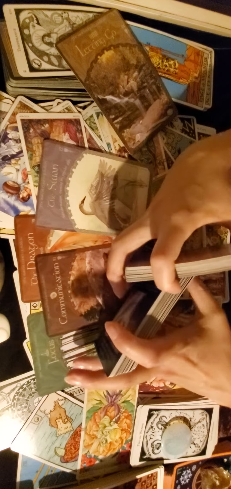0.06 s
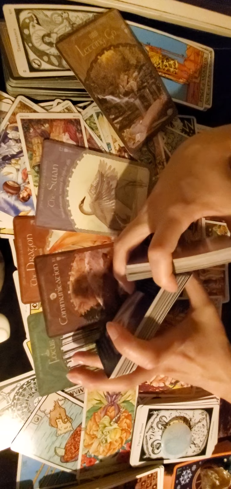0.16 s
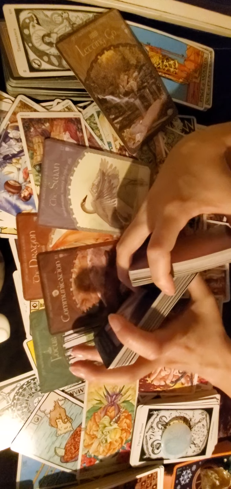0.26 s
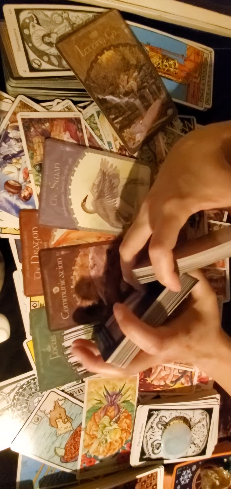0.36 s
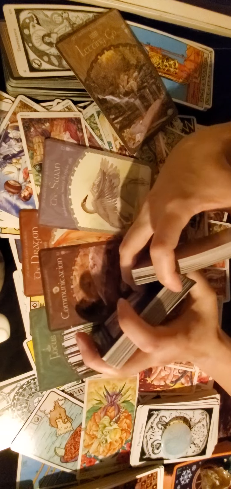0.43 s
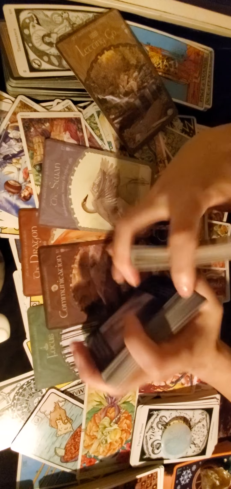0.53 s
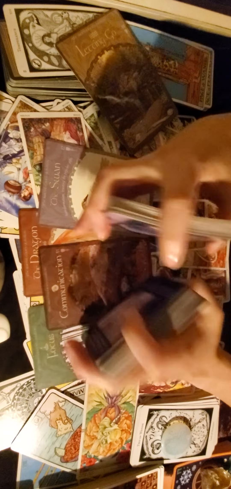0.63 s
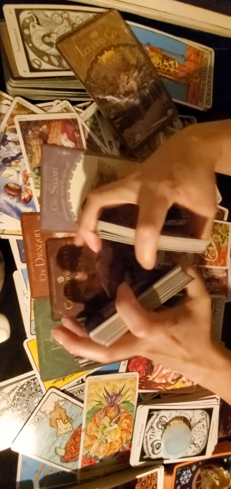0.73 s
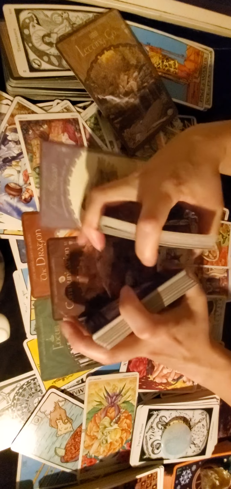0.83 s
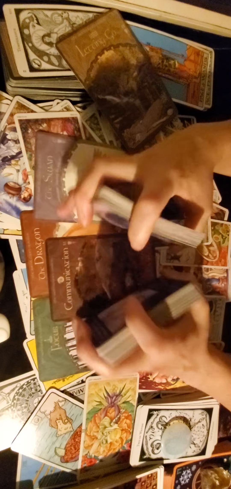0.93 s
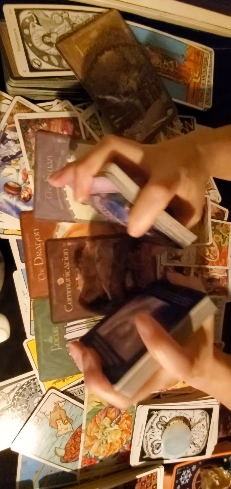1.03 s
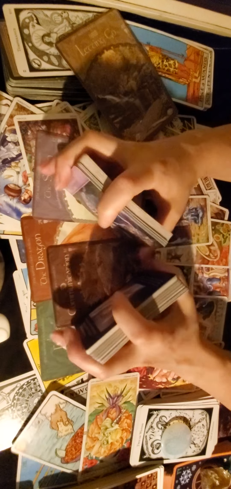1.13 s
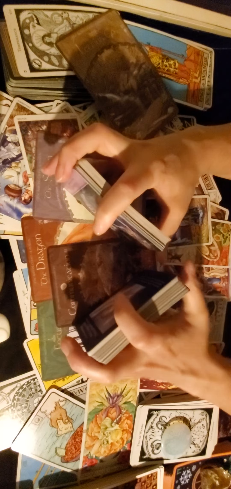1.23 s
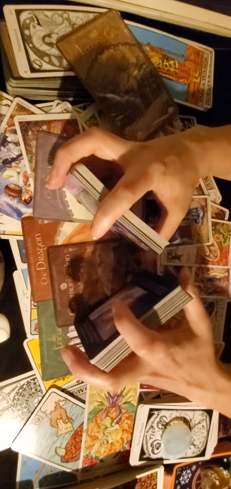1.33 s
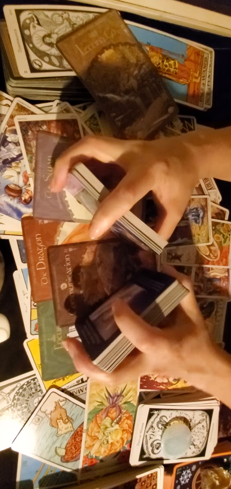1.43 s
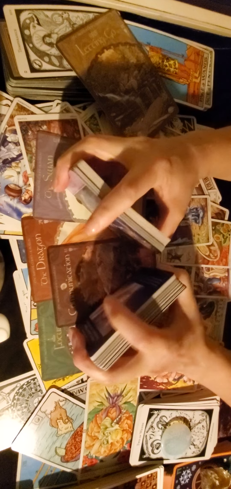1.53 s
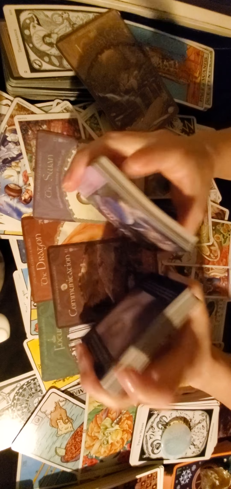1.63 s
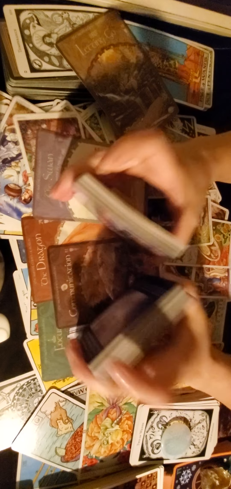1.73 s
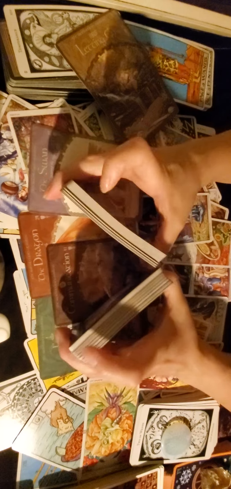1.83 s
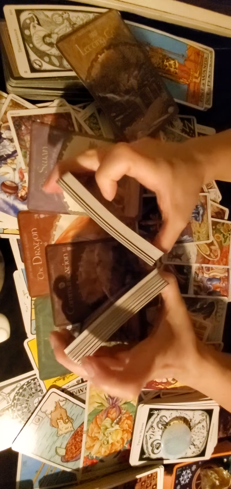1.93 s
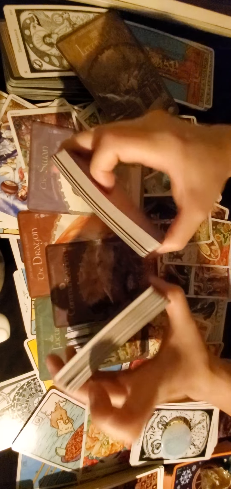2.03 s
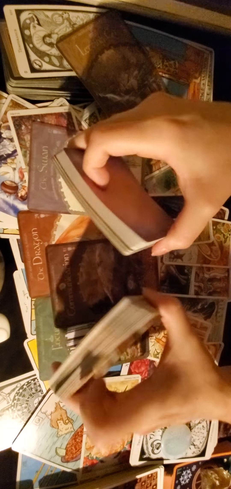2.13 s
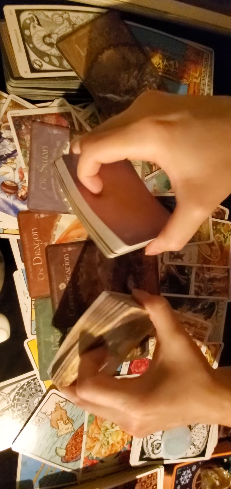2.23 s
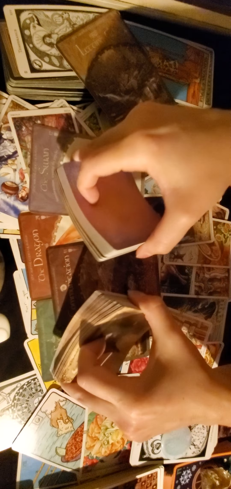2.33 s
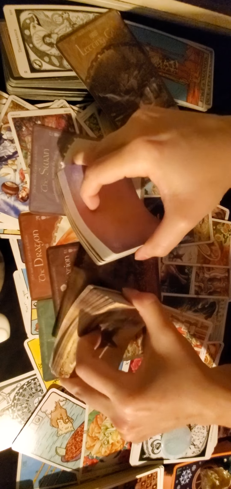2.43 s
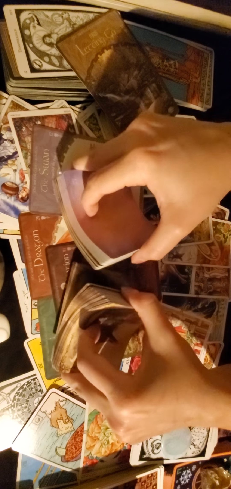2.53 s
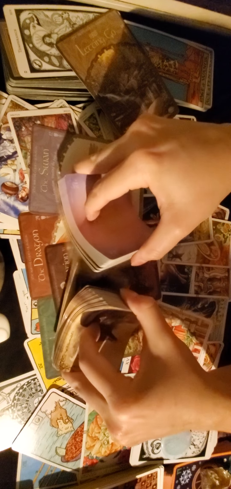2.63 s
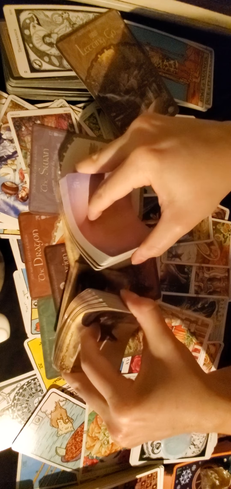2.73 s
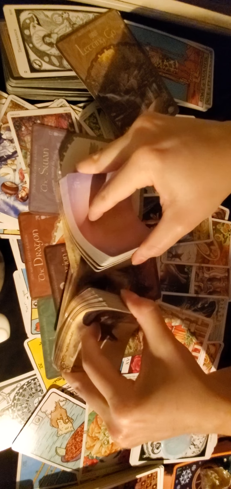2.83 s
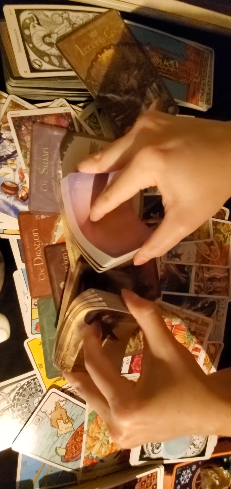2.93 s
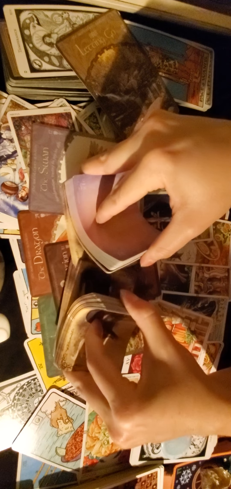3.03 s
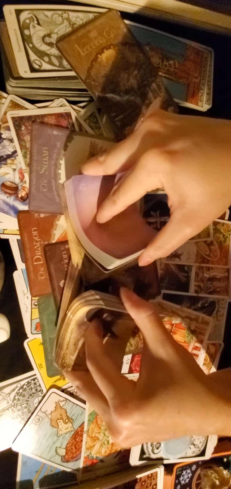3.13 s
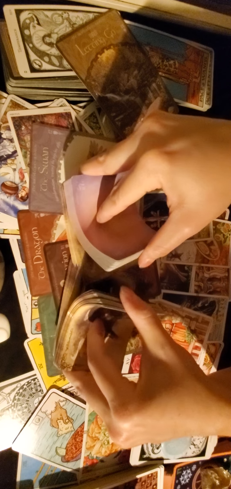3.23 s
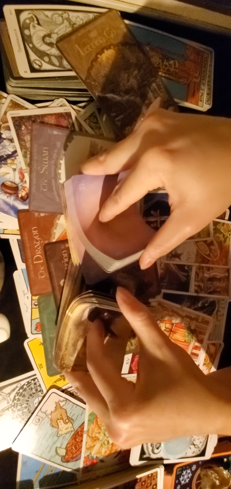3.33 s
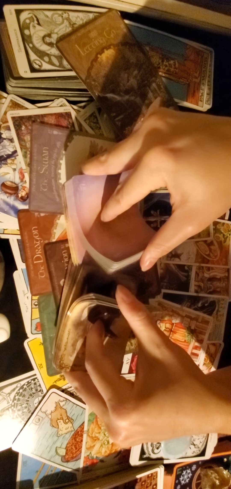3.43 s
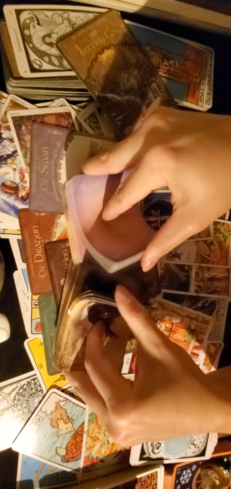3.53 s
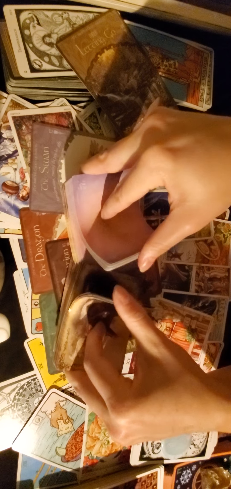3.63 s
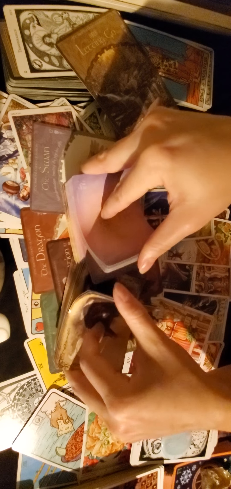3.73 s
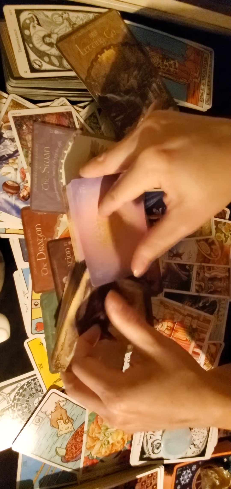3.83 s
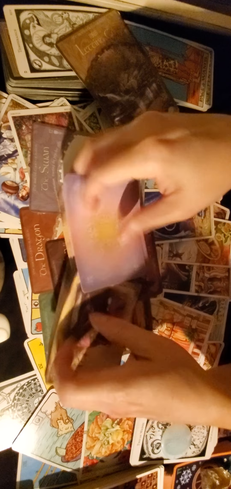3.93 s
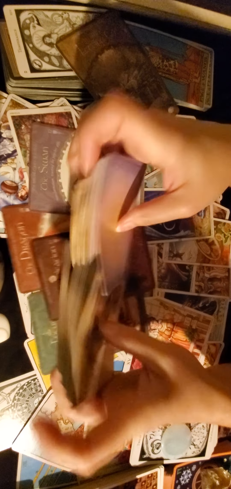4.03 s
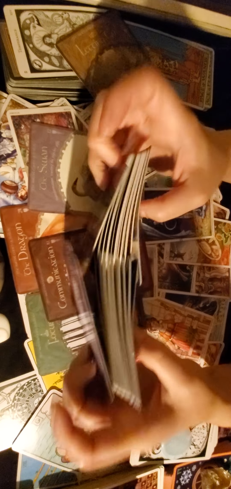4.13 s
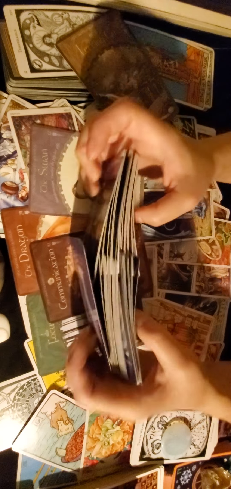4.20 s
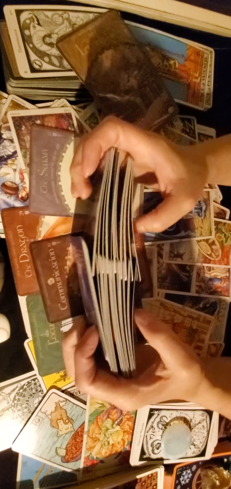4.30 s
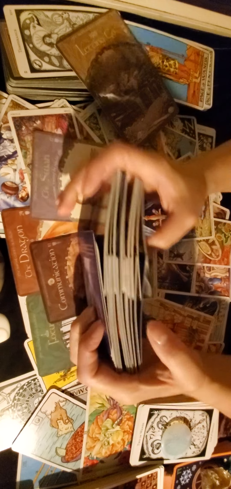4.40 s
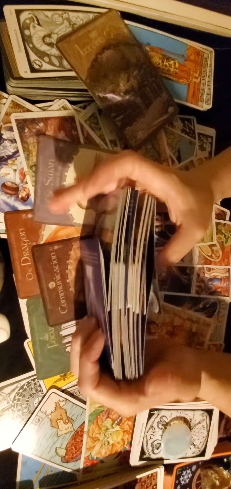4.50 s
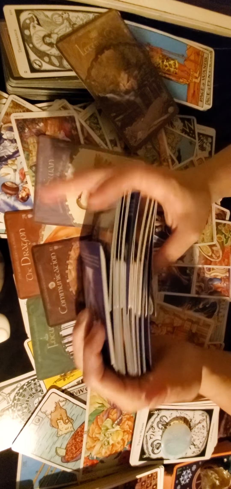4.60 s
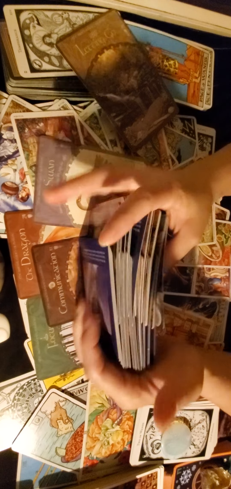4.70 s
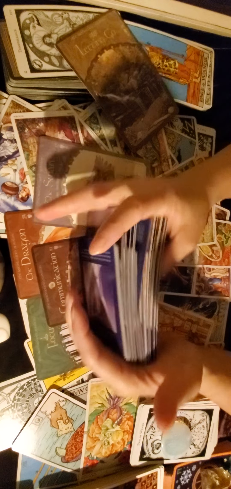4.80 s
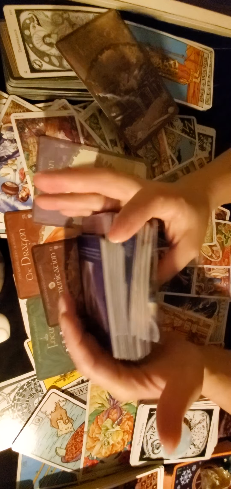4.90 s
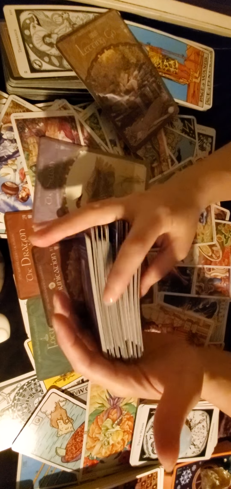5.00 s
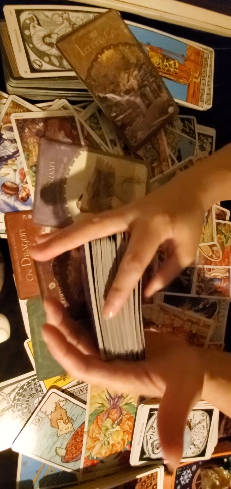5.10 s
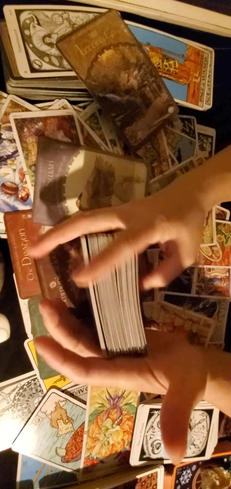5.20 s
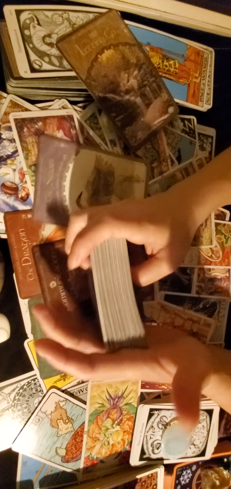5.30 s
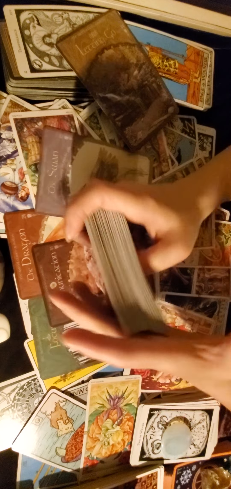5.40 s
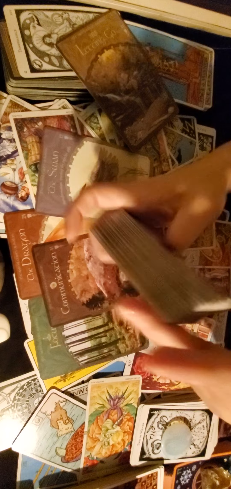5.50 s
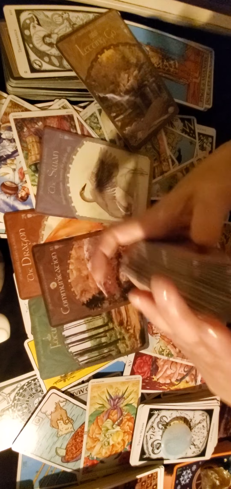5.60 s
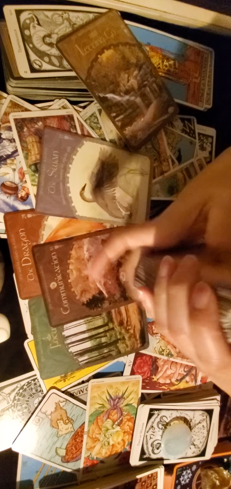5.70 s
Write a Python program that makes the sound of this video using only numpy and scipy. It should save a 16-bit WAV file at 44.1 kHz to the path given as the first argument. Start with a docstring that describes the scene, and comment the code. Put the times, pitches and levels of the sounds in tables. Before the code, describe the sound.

Hands shuffle stiff cards very near the microphones in a small room. Packets knock together three times with low thumps, edges tick quietly, then the halves interleave in a fast, irregular crackle, the loudest part. The cards fall together with a brief hollow purr, and sliding faces rustle and hiss between muted taps before fading to faint handling over a low rumble. The left side is stronger.

```python
"""A deck of stiff cards is cut, knocked on a covered table, riffled, bridged and squared, close up.
Cards snap off the thumbs: each snap is a short filtered burst with a low slap, a flexing clack and an edge tick.
Packets patter in flurries of small random touches, and sliding faces rustle and hiss as grainy noise.
Soft blows ring the table's low modes; near echoes and a small room answer over a low rumble and faint hiss."""
import sys
import numpy as np
from scipy import signal
from scipy.fft import rfft, irfft
from scipy.io import wavfile
from scipy.ndimage import uniform_filter1d

SR = 44100
rng = np.random.default_rng(int(sys.argv[2]) if len(sys.argv) > 2 else 0)


def wav_record(signal):
    """Record a signal, one row per channel, as 16-bit PCM in the file named by sys.argv[1]."""
    frames = np.transpose(np.atleast_2d(signal))
    bounded = np.clip(frames, -1, 1)
    # unit amplitude maps onto the largest positive 16-bit level
    quanta = np.round(bounded * 32767).astype(np.int16)
    wavfile.write(sys.argv[1], SR, quanta)


N = 253575
HZ, TIME = np.fft.rfftfreq(N, 1 / SR), np.arange(N) / SR

# A card edge snaps or lands. Each row: time in seconds, clack level in dB before the common trim in snaps(),
# pitch of the flexing card in Hz, edge tick in dB added to the clack column (it has its own trim).
SNAPS = [(0.184, -55, 2760, -3), (0.43, -52.5, 1750, -15), (0.766, -29, 1410, 1), (0.77, -26, 2100, -4),
         (0.792, -17.5, 2950, -24), (0.804, -23.5, 1220, -11), (1.215, -17.5, 2200, -12.5),
         (1.226, -23, 850, -8), (1.861, -25, 1210, -12), (1.867, -18, 1400, -5.5), (1.88, -23.5, 1500, -13),
         (2.003, -48.5, 1210, -9.5), (2.124, -45, 2150, -6), (2.364, -51.5, 982, -12),
         (2.432, -44, 1490, -11), (2.574, -23.5, 2600, -6.5), (2.608, -33.5, 1250, -3),
         (2.617, -30.5, 1165, -14), (2.642, -33.5, 1150, -8.5), (2.689, -34.5, 1260, -9.5),
         (2.73, -29.5, 1590, -9.5), (2.74, -19.5, 1510, -15.5), (2.771, -10.5, 1480, -10.5),
         (2.813, -11, 1150, -7), (2.844, -30, 1600, -5.5), (2.856, -9.5, 3030, -11.5),
         (2.935, -10.5, 740, -12), (2.973, -11.5, 2100, -11.5), (3.037, -6, 1400, -13.5),
         (3.115, -20, 2550, -11), (3.135, -8.5, 1580, -17.5), (3.157, -6.5, 1680, -14.5),
         (3.218, -7, 1770, -13), (3.309, -7.5, 1500, -17.5), (3.332, -4.5, 1520, -20),
         (3.362, -17, 1190, -4), (3.4, -13.5, 1380, -15.5), (3.413, -6.5, 1570, -15.5),
         (3.427, -15.5, 1580, -11), (3.502, -35, 1180, 9.5), (3.51, -16.5, 3150, -13.5),
         (3.532, -13.5, 1360, -2.5), (3.552, -17, 1450, -6.5), (3.572, -14, 1540, -4),
         (3.649, -20.5, 1590, -2.5), (3.676, -14.5, 2840, -6.5), (3.756, -7.5, 1580, -17.5),
         (3.841, -14.5, 1720, -14.5), (3.908, -11, 2480, -7), (3.925, -11.5, 1900, -22),
         (3.938, -21, 3390, 2), (3.945, -13, 2900, -4.5), (4.061, -33, 3600, -6), (4.251, -32, 1360, -29),
         (4.311, -14.5, 1700, -18.5), (4.322, -13, 1390, -18), (4.328, -6.5, 2240, -20.5),
         (4.352, -13, 910, -25), (4.365, -13.5, 1160, -16.5), (4.373, -17.5, 964, -36),
         (4.402, -20.5, 1670, -23.5), (4.421, -22, 1250, -27), (4.651, -27.5, 1260, -25.5),
         (4.681, -30.5, 1250, -28), (4.724, -25, 815, -35), (4.831, -36, 921, -12), (4.887, -33, 904, -23),
         (5.051, -20.5, 1680, -18.5), (5.11, -19, 905, -24), (5.156, -23, 940, -35),
         (5.386, -31, 1760, -23), (5.554, -47.5, 1150, -2.5)]

SLAP_HZ, TICK_HZ = 800, 3600  # the low slap lies below the first, the edge tick above the second
ARCH_S, LIFT_S = 2.3, 4.2  # seconds: the packets are bent for the riffle; the deck leaves the table
RIFFLE_S = (2.75, 3.96)  # seconds: start and end of the time when the halves interleave


def amp(db):
    """Turns decibels into a gain."""
    return 10 ** (np.asarray(db) / 20)


def unit(x):
    """Scales to an rms (average strength) of one."""
    return x / np.sqrt(np.mean(x ** 2) + 1e-20)


def read(points, hz):
    """Reads a table of (Hz, value) at any frequency, joining its points on a log-frequency axis."""
    f, value = np.transpose(points)
    return np.interp(np.log(hz + 1), np.log(f + 1), value)


def add(mix, s, sound):
    """Mixes a sound in at a time in seconds."""
    part = mix[max(round(s * SR), 0):][:len(sound)]
    part += sound[:len(part)]


def tint(x, gain):
    """Filters a whole track by a gain for each frequency."""
    return irfft(rfft(x) * gain, N)


def causal(x, gain):
    """Minimum-phase filter: it rings only after it is struck."""
    size = 2 * (len(gain) - 1)
    both_sides = np.r_[gain, gain[-2:0:-1]]
    log_gain = np.log(np.maximum(both_sides, 1e-5))
    ring = np.fft.ifft(np.exp(signal.hilbert(log_gain).conj())).real
    return signal.fftconvolve(x, ring[:size // 2])


def burst(envelope, evenness=0.22):
    """A short random push with its energy spread fairly evenly over frequency."""
    spectrum = rfft(rng.standard_normal(len(envelope)) * envelope)
    return irfft(spectrum / (abs(spectrum) + 1e-9) ** evenness, len(envelope))


def scatter(decay_s=0.0018, size=512):
    """A short spray of reflections off hands and cards."""
    spray = burst(np.exp(-np.arange(size) / SR / decay_s), evenness=0.45)
    return spray / np.linalg.norm(spray)


def shifting(x, response, turn_s=0.11, count=4):
    """The hands keep moving, so the sound fades from one set of reflections to the next, round and round."""
    out = np.zeros(N)
    for k in range(count):
        away = abs((TIME / turn_s - k + count / 2) % count - count / 2)  # in turns from this set's moment
        fade = np.cos(np.pi / 2 * np.minimum(away, 1))
        out += signal.oaconvolve(x * fade, response())[:N]
    return out


def card_bands(s, size=2048, unbent_share=0.35, cupped_hz=374):
    """The card's response at a moment, split into low slap, middle clack and high edge tick."""
    # Tone of the card stock. Each row: frequency in Hz, level in dB per Hz.
    stock = [(60, -13.5), (150, -7.5), (280, -5.5), (500, -3.5), (1000, -4.5), (2000, -6), (3100, -4.5),
             (4000, -6), (5600, -3.5), (6600, -4), (7600, -11.5), (10500, -8), (13000, -12), (15500, -9.5)]
    # Air trapped between cards and hands. Each row: frequency in Hz, width in Hz, full boost in dB with the
    # deck on the table, full boost in dB with it cupped in the hands.
    hollow = [(406, 92, 9.5, 5), (641, 240, 3, 9.5), (805, 53, -6, -0.5), (983, 74, 0, 6.5),
              (1258, 57, 0.5, 5.5), (1600, 190, 3.5, 5.5), (2282, 140, 3.5, 5)]
    hz = np.fft.rfftfreq(size, 1 / SR)
    cupped = s > LIFT_S
    depth = 1 if s > ARCH_S else unbent_share  # unbent packets show only a share of the boost
    boost = sum((held if cupped else flat) / (1 + (2 * (hz - f) / width) ** 2)
                for f, width, flat, held in hollow)
    colour = amp(read(stock, hz) + depth * boost)
    if cupped:  # cards held in the air lose their bass
        colour = colour * np.sqrt(1 - 1 / (1 + (hz / cupped_hz) ** 4))
    low = 1 / (1 + (hz / SLAP_HZ) ** 10)
    high = 1 - 1 / (1 + (hz / TICK_HZ) ** 10)
    middle = abs(1 - low - high)
    return hz, colour * np.sqrt(low), colour * np.sqrt(middle), colour * np.sqrt(high)


def sliding(grain_db=3.0, grain_size=90, ends_db=14, speeding=0.29,
            grip_db=-83, grip_swell_db=3, grip_size=5000):
    """Faces of cards rub with a fine grain: faintly all the while in the grip, louder as a stroke speeds up."""
    # Tone of the rubbing. Each row: frequency in Hz, level in dB per Hz.
    rub = [(180, -42), (300, -10), (519, -7), (612, -3), (2510, -4), (2910, -4.5), (6240, -4.5),
           (7490, -9.5), (14300, -7), (15800, -16.5)]
    # Strokes. Each row: fastest moment in seconds, length in seconds, rustle in dB, hiss in dB (at the fastest).
    strokes = [(0.033, 0.44, -68.5, -71), (0.143, 0.025, -77, -61.5), (0.382, .12, -65.5, -64),
               (0.959, 0.1, -72, -63.5), (1.302, 0.046, -43.5, -51), (1.617, 0.2, -96, -75),
               (2.065, 0.2, -70.5, -71), (2.373, 0.21, -73.5, -76), (4.092, 0.22, -55, -51),
               (4.498, 0.13, -45.5, -44), (4.74, 0.073, -41.5, -43.5), (4.921, 0.081, -39.5, -43),
               (5.216, 0.052, -41.5, -49), (5.412, 0.2, -57.5, -56.5), (5.7, 0.69, -75, -69.5)]
    grain = amp(grain_db * unit(uniform_filter1d(rng.standard_normal(N), grain_size)))
    high = 1 - 1 / (1 + (HZ / TICK_HZ) ** 8)
    tone = amp(read(rub, HZ))
    rustle = unit(tint(grain * rng.standard_normal(N), tone * np.sqrt(1 - high)))
    hiss = unit(tint(grain * rng.standard_normal(N), tone * np.sqrt(high)))
    grip_swell = unit(uniform_filter1d(rng.standard_normal(N), grip_size))
    out = amp(grip_db + grip_swell_db * grip_swell) * (rustle + hiss)
    for top, length, rustle_db, hiss_db in strokes:
        share = np.where(TIME < top, speeding, 1 - speeding)  # of the stroke: speeding up, slowing down
        away = (TIME - top) / (length * share)
        out += amp(-ends_db * away ** 2) * (amp(rustle_db) * rustle + amp(hiss_db) * hiss)
    return out


def fingers(per_s=40, level_db=-70, spread_db=4, dull_hz=2200):
    """Fingertips shift their grip all the while: faint, soft ticks on the card edges."""
    hz, slap, clack, tick = card_bands(0)
    touches = (rng.random(N) < per_s / SR) * amp(spread_db * rng.uniform(-2.0, 1, N))
    colour = (slap + clack + tick) / np.sqrt(1 + (hz / dull_hz) ** 2)
    scale = np.sqrt(0.005 * SR)  # levels are rms over 5 ms
    return amp(level_db) * scale * causal(touches, unit(colour))[:N]


def near_echoes(wander=0.06, size=1024):
    """Single reflections off nearby surfaces, their paths a little different for each hand position."""
    # Each row: typical delay in seconds, level in dB.
    echoes = [(.0034, -21.5), (.0074, -21.5), (.0088, -20.5), (0.01, -17.5), (0.0177, -32)]
    taps = np.zeros(size)
    for s, db in echoes:
        add(taps, s * (1 + wander * rng.uniform(-1, 1)), amp([db]))
    return taps


def room(wet_db=-12.5, build_s=0.0041):
    """A diffuse tail that builds quickly, each band dying at its own speed."""
    # Each row: frequency in Hz, time to fade by 60 dB in seconds.
    fade_times = [(100, 0.93), (500, 0.26), (2000, 0.24), (6000, 0.23), (15000, 0.23)]
    hz, t, z = signal.stft(rng.standard_normal(SR // 2), SR, nperseg=256)
    fade = amp(-60 * t / read(fade_times, hz)[:, None])
    tail = signal.istft(z * fade, SR, nperseg=256)[1]
    tail_time = np.arange(len(tail)) / SR
    tail = tail * (1 - np.exp(-(tail_time / build_s) ** 2))
    return amp(wet_db) * tail / np.linalg.norm(tail)


def far_side(x, lag_s=0.000015):
    """The right side lies in shadow: it gets part of the direct sound, a little late, and part scattered."""
    # Each row: frequency in Hz, left-right likeness from 0 to 1.
    likeness = [(100, 0.77), (1000, 0.8), (2000, 0.8), (4000, 0.17), (12000, 0.55)]
    alike = read(likeness, HZ)
    late = tint(x, alike * np.exp(-2j * np.pi * HZ * lag_s))
    return late + tint(shifting(x, scatter, count=7), np.sqrt(1 - alike ** 2))


def background(rumble_db=-55.5, air_db=-79.5, apart=0.42, right_db=-3):
    """Low room rumble, nearly the same on both sides and slowly swelling, and faint hiss."""
    # Tone of the rumble. Each row: frequency in Hz, level in dB per Hz.
    rumble_tone = [(12, -48.5), (20, -14), (27, -8.5), (43, -8), (60, -1), (71, 1), (87, -15.5), (128, -9),
                   (168, -16.5), (403, -29), (461, -40.5), (500, -33), (650, -66.5), (1100, -120)]
    # Swell of the rumble. Each row: time in seconds, change in dB added to rumble_db.
    rumble_swell = [(0, -5), (.7, -2.5), (4.3, 3), (5.7, -1.5)]
    tone = amp(read(rumble_tone, HZ))
    shared, other = (unit(tint(rng.standard_normal(N), tone)) for _ in range(2))
    rumble = np.array([shared + apart * other, amp(right_db) * (shared - apart * other)])
    level_db = rumble_db + np.interp(TIME, *np.transpose(rumble_swell))
    return amp(level_db) * rumble + amp(air_db) * rng.standard_normal((2, N))


def riffled():
    """The snaps that fall while the halves interleave."""
    return [row for row in SNAPS if RIFFLE_S[0] < row[0] < RIFFLE_S[1]]


def slips(lead_s=0.0105, lead_spread=0.2, level_db=-20.5, extra_tick_db=5.5, how_often=0.62):
    """Single cards often slip off the thumb just ahead of a riffled clump, fainter and brighter."""
    out = []
    draws = rng.random((len(SNAPS), 2))
    for (s, db, pitch, bright), (chance, when) in zip(riffled(), draws):
        if chance < how_often:
            lead = lead_s * (1 + lead_spread * (2 * when - 1))
            out.append((s - lead, db + level_db, pitch, bright + extra_tick_db))
    return out


def snaps(slap_s=0.0026, clack_s=0.0023, tick_s=0.0018, rise_s=0.00035, release_s=0.0008, scrape=0.035,
          flex_db=7, flex_width_hz=600, clack_db=-6.0, tick_db=2.0,
          flat_slap_db=-12, cupped_slap_db=-11, slap_per_db=-0.23):
    """An edge scrapes off the thumb and lets go; the card flexes for a few cycles."""
    t, out = np.arange(-176, 592) / SR, np.zeros(N)
    after = np.maximum(t, 0)
    lead_in = scrape * np.interp(t, [t[0], 0, rise_s], [0, 1, 0])
    scale = np.sqrt(0.005 * SR)  # levels are rms over 5 ms
    for s, db, pitch, bright in list(SNAPS) + slips():
        hz, slap, clack, tick = card_bands(s)
        flex = amp(flex_db / (1 + (2 * (hz - pitch) / flex_width_hz) ** 2))
        # softer snaps have more slap for their clack
        slap_db = (cupped_slap_db if s > LIFT_S else flat_slap_db) + slap_per_db * db
        parts = ((slap, slap_s, slap_db + clack_db),
                 (clack * flex, clack_s, clack_db),
                 (tick, tick_s, bright + tick_db))
        for gain, decay, level in parts:
            push = lead_in + np.exp(-after / decay) * (1 - np.exp(-after / rise_s))
            sound = causal(burst(push), gain)
            sound = sound / np.linalg.norm(sound)
            add(out, s + release_s + t[0], amp(db + level) * scale * sound)
    return out


def dragged_cards(lead_s=0.001, trail_s=0.022, level_db=-23, cards=5):
    """Each riffled snap drags neighbours along: a small flurry with half of the snap's edge tick setting."""
    rate = cards / (lead_s + trail_s)
    return [(s - lead_s, s, s + trail_s, db + level_db, bright / 2, rate)
            for s, db, pitch, bright in riffled()]


def flurries(per_s=230, fewest_cards=18, spread_db=6, contact_s=0.0016, ends_db=11,
             flat_slap_db=-6, cupped_slap_db=-3.0, count=256):
    """Cards land at uneven intervals, in packets and around riffled snaps; cupped hands push more air."""
    # Falling packets. Each row: start, fullest moment and end in seconds, clack level in dB at the fullest,
    # edge tick in dB relative to the clack.
    falls = [(0.765, 0.792, .822, -30.5, -3), (1.202, 1.219, 1.243, -33, -11.5),
             (1.864, 1.868, 1.905, -31, -3), (2.551, 2.582, 2.72, -46, -8), (3.102, 3.106, 3.2, -33.5, -1),
             (3.36, 3.386, 3.445, -32.5, 3.5), (3.747, 3.752, 3.772, -23.5, 5.5),
             (3.869, 3.895, 3.968, -33, 3.5), (4.256, 4.329, 4.4, -28.5, -14.5),
             (5.015, 5.07, 5.09, -33, -13.5), (5.068, 5.092, 5.26, -48.5, -2.5),
             (5.314, 5.343, 5.41, -56.5, -25)]
    out = np.zeros(N)
    # a packet dropped at once lands in a tighter cluster
    packets = [(*row, max(per_s, fewest_cards / (row[2] - row[0]))) for row in falls]
    for start, top, end, db, bright, rate in packets + dragged_cards():
        hz, slap, clack, tick = card_bands(start)
        t = np.arange(start, max(end, start + 0.01), 1 / SR)
        landings = ((np.arange(count) + rng.random(count)) / rate * SR).astype(int)
        strengths = amp(spread_db * rng.uniform(-2.5, 1, count))
        hits = np.bincount(landings, strengths, len(t))[:len(t)]
        # each touch lasts a moment
        contact = signal.lfilter([1], [1, -np.exp(-1 / (contact_s * SR))], hits)
        swell = amp(np.interp(t, [start, top, end], [-ends_db, 0, -ends_db]))
        push = unit(contact * rng.standard_normal(SR // 2)[:len(t)]) * swell
        slap_db = cupped_slap_db if start > LIFT_S else flat_slap_db
        for gain, level in (slap, slap_db), (clack, 0), (tick, bright):
            add(out, start, amp(db + level) * causal(push, unit(gain)))
    return out


def table(cards, rise_s=0.0032, landing_db=-43, shake_db=-35, pressed_hz=195, pressed_width_hz=150,
          lowest_hz=50):
    """Soft blows ring the low modes of the table; cards sounding before the deck is lifted shake it too."""
    # A packet or a hand meets the table. Each row: time in seconds, level in dB.
    knocks = [(0.796, -38), (1.225, -29.5), (1.88, -26), (2.082, -48), (3.929, -34), (4.137, -42),
              (4.215, -43), (5.562, -47.5)]
    # Ringing modes of the table top. Each row: frequency in Hz, level in dB, time to fade by 60 dB in seconds.
    modes = [(57.4, -8.5, 0.88), (65, 2, 0.13), (85.6, 4, 0.19), (101, -3, 0.3), (144.5, 0, 0.24),
             (217.8, -17, 0.28), (299.3, -16, 0.23), (514, -19.5, 0.15), (704, -25, 0.1)]
    t, out = np.arange(SR // 2) / SR, np.zeros(N)
    ringing = sum(amp(db - 60 * t / t60) * np.sin(2 * np.pi * hz * t) for hz, db, t60 in modes)
    thud = ringing * (1 - np.exp(-t / rise_s))
    landings = [(s, landing_db) for s, *_ in riffled()]  # every riffled clump thuds on the table
    for s, db in list(knocks) + landings:
        add(out, s, amp(db) * thud)
    shake = np.exp(-np.pi * pressed_width_hz * t) * np.sin(2 * np.pi * pressed_hz * t)
    out += amp(shake_db) * signal.fftconvolve(cards * (TIME < LIFT_S), shake)[:N]
    # the thuds carry little below lowest_hz
    return signal.sosfilt(signal.butter(2, lowest_hz, "high", fs=SR, output="sos"), out)


def scene():
    """The cards with their near echoes and room, louder on the left, over the table and the rumble."""
    # Tone of the right side. Each row: frequency in Hz, gain in dB applied to the right.
    right_tone = [(60, -0.5), (125, -8), (250, -3), (500, -11), (1000, -10), (2000, -11.5), (4500, -17),
                  (8000, -14), (12000, -8.5)]
    handling = shifting(sliding() + fingers(), scatter, count=9)  # escapes between the moving fingers
    direct = snaps() + flurries() + handling
    thuds = table(direct)
    sides = []
    for heard in (direct, far_side(direct)):
        reflections = shifting(direct, near_echoes, count=7) + shifting(direct, room)
        sides.append(heard + reflections + thuds)
    left, right = sides
    return np.array([left, tint(right, amp(read(right_tone, HZ)))]) + background()


def record(dry, edge_hz=16000):
    """The sharpest peaks round off just under full scale; then the treble above the band edge is cut."""
    held = dry / (1 + dry ** 6) ** (1 / 6)
    band_limit = signal.firwin(301, edge_hz, window=("kaiser", 7), fs=SR)
    return signal.oaconvolve(held, band_limit[None], "same")


dry = scene()
out = record(dry)
wav_record(out)
```